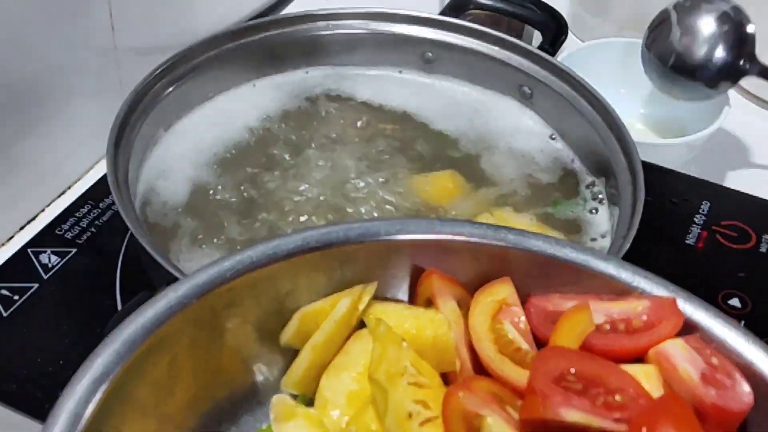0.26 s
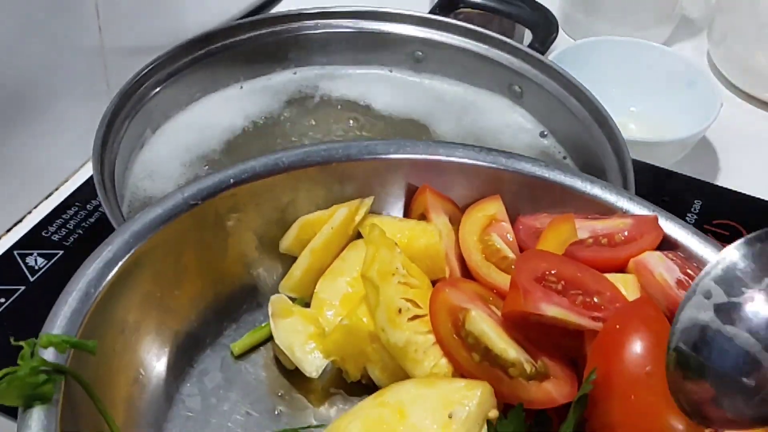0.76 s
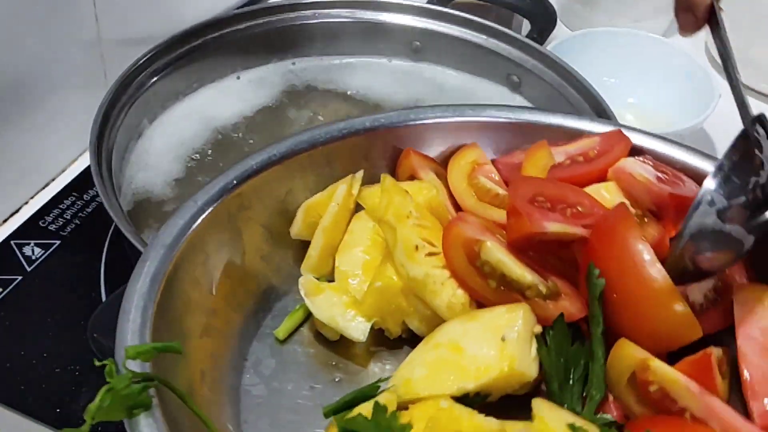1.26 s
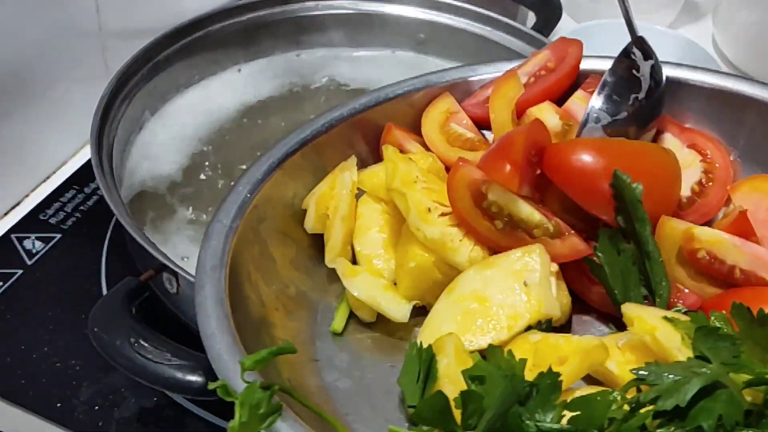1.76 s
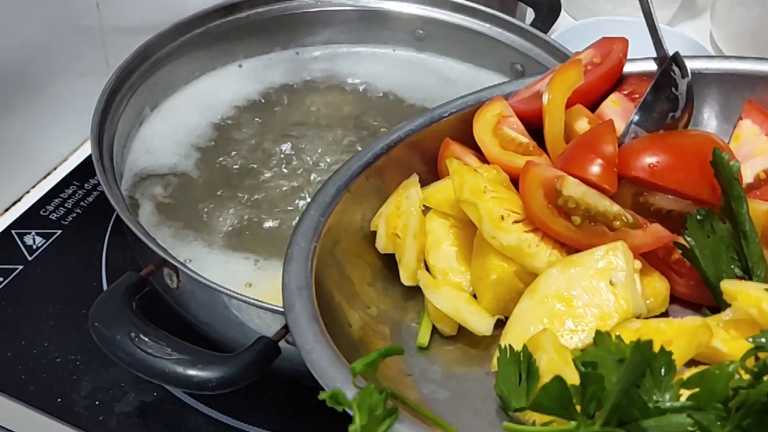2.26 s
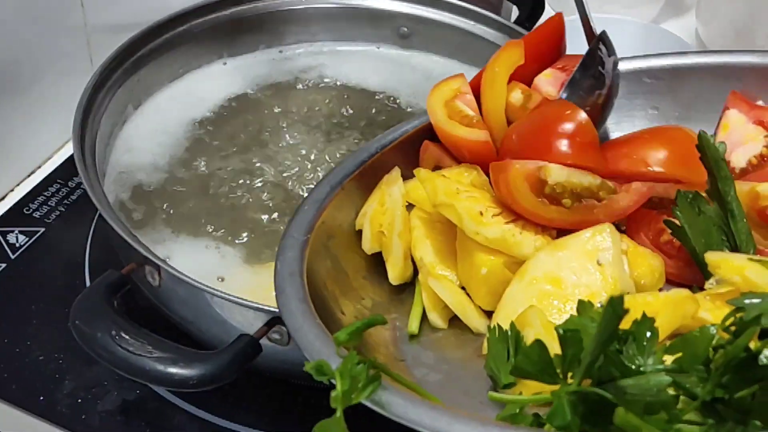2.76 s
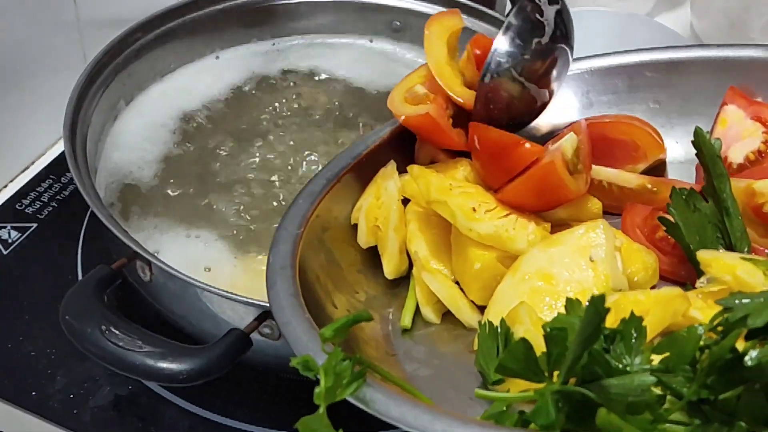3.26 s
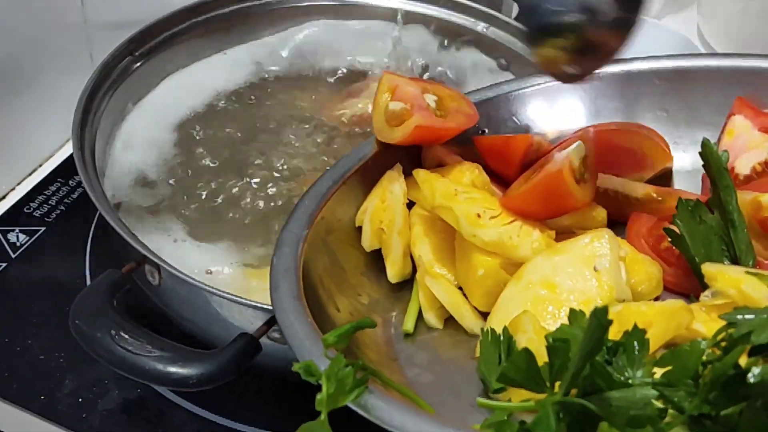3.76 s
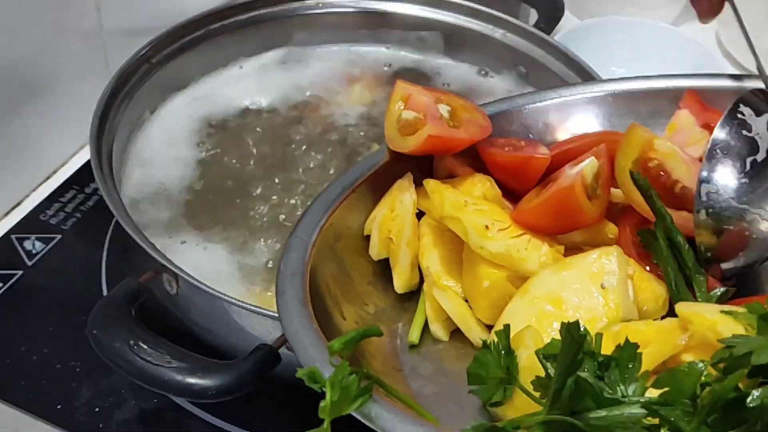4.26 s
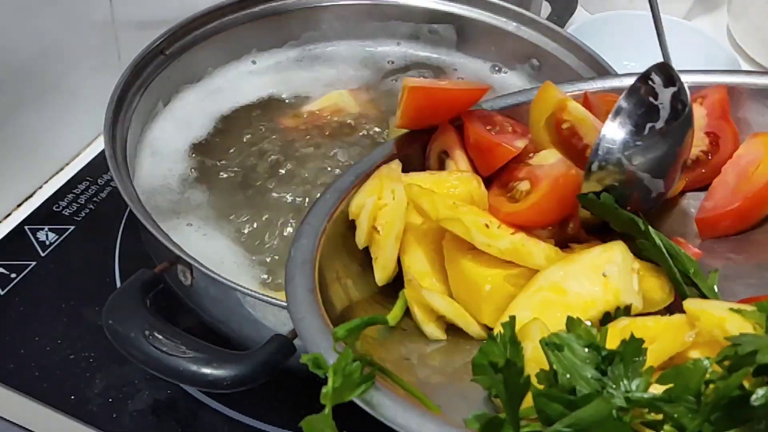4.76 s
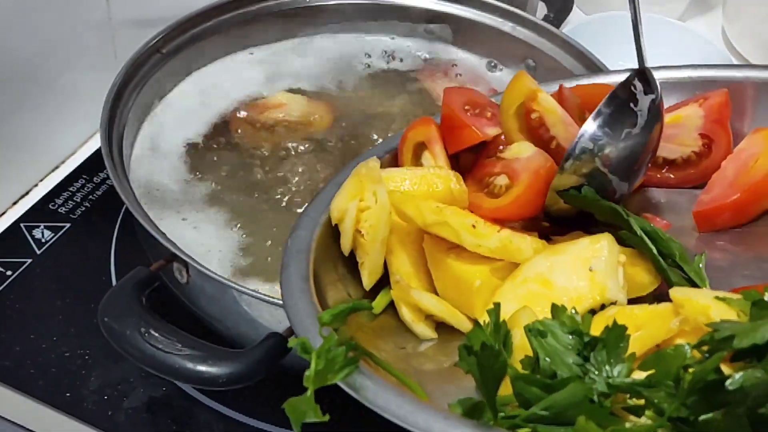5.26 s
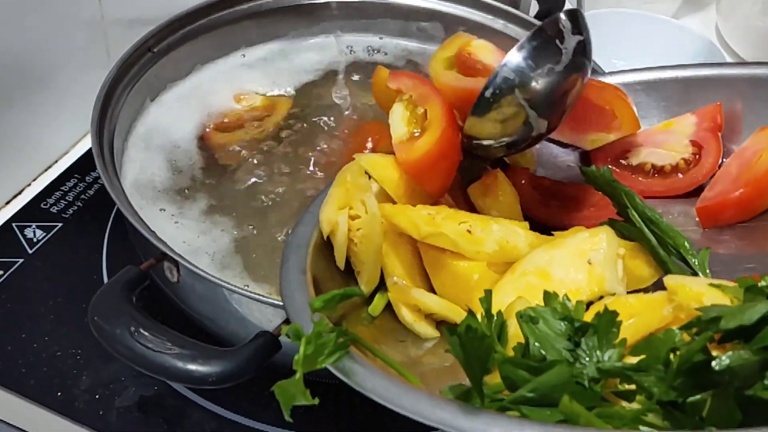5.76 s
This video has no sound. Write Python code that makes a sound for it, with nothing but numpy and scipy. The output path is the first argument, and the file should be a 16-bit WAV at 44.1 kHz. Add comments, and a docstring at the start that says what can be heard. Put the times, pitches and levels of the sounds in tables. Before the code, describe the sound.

Over a humming kitchen fan and fizzing pot, a ladle rings on china, then taps and scrapes intermittently in a food-filled metal bowl.

```python
"""A fan's hum is heard first; over it a steel ladle slides off a small china bowl, which clinks and rocks.
The ladle then knocks, scrapes and squeaks in a loaded steel bowl, beside a fizzing pot in a tiled kitchen.
Blows excite decaying modes, slips drive resonances, and locked slips sing as gliding notes.
Fan and rumble are shaped noise, narrow resonances and sines; the fizz is a dense train of coloured clicks."""
import sys
import numpy as np
from scipy import signal
from scipy.fft import rfft, irfft
from scipy.io import wavfile
from scipy.ndimage import uniform_filter1d

SR = 44100
rng = np.random.default_rng(int(sys.argv[2]) if len(sys.argv) > 2 else 0)


def transcribe(signal):
    """Save signal, clipped to [-1, 1], as a 16-bit WAV file at the path in sys.argv[1]."""
    frames = np.atleast_2d(signal).T
    limited = np.clip(frames, -1, 1)
    pcm = np.round(limited * 32767).astype(np.int16)
    wavfile.write(sys.argv[1], SR, pcm)


N = 264600
T = np.arange(N) / SR
RING_T = T[:SR * 3 // 4]   # time axis of one blow or echo [s]
LOW_SPLIT_HZ, HIGH_SPLIT_HZ = 1143, 4090
CUTOFF_HZ = 7820

# ladle clinking on the china bowl: (time [s], level [dB], thud [dB], brightness [dB], crack [dB],
# damping [Hz], none if negative); thud and brightness are relative to the middle band
CHINA_CLINKS = [(0.1528, -29, -1.5, 8.5, -11.5, 49), (0.1588, -32.5, -3.5, 13, 2.5, 23),
                (0.1632, -30, -2.5, -1, -1, -7), (0.166, -32, -1.5, 5, 2.5, -4)]
# china bowl rocking on the counter, before the split into two contacts: the columns of the clinks,
# then (place [0 one side of the foot to 1 the other])
BOWL_KNOCKS = [(0.2868, -27, 3, -29, -1, 29, 0.17), (0.313, -26.5, -0.5, -24, 2, 27, 0.3),
               (0.3448, -32.5, 9, -2, -6.5, 36, 1)]
# ladle sliding off the china: (start [s], end [s], treble rasp [dB], middle against treble [dB])
CHINA_STROKES = [(0.088, 0.118, -30, -14)]
# modes of the ladle and china ringing freely: (frequency [Hz], level [dB], t60 [s])
LADLE_MODES = [(310, -18.5, .2), (600, -7, .063), (770, -8, .08), (792, -11, .37), (1020, -11.5, .13),
               (1275, -8, .4), (1333, -1, .11), (1650, -12, .15), (2100, -9, .22), (2380, -12, .08),
               (2702, -7, .29), (3480, -12, .1), (4204, -18, .3), (4588, -4, .5), (4613, -1, .62),
               (4721, -5, .4), (4920, 0, .28), (5125, 1, .15), (5329, 3, .25), (5507, -4, .35),
               (6896, 3, .26), (6962, -3, .5), (7030, -3, .55), (7208, -4, .36), (5450, 10, .03),
               (5890, 16.5, .035), (6450, 3, .04)]
# modes of the china bowl on the counter, before contact damping:
# (frequency [Hz], level on one side of the foot [dB], level on the other [dB], t60 [s])
CHINA_MODES = [(280, -9, -9, .08), (450, -11, -6, .04), (630, -3, 5, .026), (800, 2, -3, .03),
               (950, 0, -4, .026), (1215, -15, -15, .1), (1276, -14, -13, .3), (1345, -9, -10, .09),
               (1380, -15, -15, .31), (1412, -7, -9, .06), (1465, -14, -13, .11), (1525, -10, -9, .1),
               (1728, -19, -16, .18), (1943, -20, -17, .2), (2013, -12, -15, .11), (2083, -16, -17, .25),
               (2299, -18, -18, .2), (2605, -9, -16, .07), (2708, -20, -20, .28), (2970, -14, -17, .06),
               (4610, -21, -21, .08), (6200, -22, -2, .05)]
# phase of the left port against the right, ladle in the air: (frequency [Hz], phase [rad])
LADLE_PORT_PHASE = [(300, 0), (900, -.5), (1800, -2), (3000, -2), (4600, 2.2), (5700, 2.3), (6890, 2.6),
                    (7010, 0)]
# the same for the china bowl: (frequency [Hz], phase [rad])
CHINA_PORT_PHASE = [(300, -0.5), (900, 1), (1300, -2.5), (3000, -2), (4500, -7), (6200, 25.5)]
RING_STOP_S, RING_STOP_DB_PER_S = 0.37, 297   # the hand stills the ladle


def ladle_on_china():
    """Friction and impact: the ladle slides, clinks and rings until the hand damps it; the bowl rocks."""
    # reciprocity of decay and bandwidth: a mode's ring time sets its width
    resonances = [(hz, np.log(1000) / (np.pi * t60), db) for hz, db, t60 in LADLE_MODES]
    slide = scrapes(CHINA_STROKES, resonances, slips_per_s=7900, spread_db=5, smear_hz=600)
    ring = blows(CHINA_CLINKS, LADLE_MODES, LADLE_PORT_PHASE, crack_t60=0.15, lowest_hz=310, pan_db=2.0)
    grip = from_db(-RING_STOP_DB_PER_S * np.maximum(T - RING_STOP_S, 0))
    contacts = bounces(BOWL_KNOCKS, gap_s=.0038, first_thud_db=-9, second_thud_db=1.5,
                       second_db=0.5, second_treble_db=-10.5, free_share=.07)
    rocking = blows(contacts, CHINA_MODES, CHINA_PORT_PHASE, crack_t60=0.079, lowest_hz=197, pan_db=0.0)
    return slide + grip * ring + rocking


# ladle striking the steel bowl, before the split into two contacts: (time [s], level [dB], thud [dB],
# brightness [dB], crack [dB], damping [Hz], place [0 bottom to 1 wall])
STEEL_TAPS = [(0.9358, -45, 9, -2, -8, 70, 0.48), (1.0352, -51, 11.5, 13.5, -7, 50, 0.49),
              (1.0598, -46.5, 7, 0, 3, 60, 0.76), (1.0655, -40, -6, 1.5, 7, 40, 0.41),
              (1.0908, -43.5, -16, 2, 7, 40, 0.79), (1.103, -49.5, -17, 1, 14, 40, .2),
              (1.264, -45.5, -1, 4.5, 3.5, 39.8, 0.36), (1.686, -28.5, 1, 2.5, -12, 35.8, 0.044),
              (1.905, -50.5, 10, 3.5, -6.5, 40, 0.27), (2.0103, -50, 14, 10, -7, 25, 0.49),
              (2.967, -49.5, 10, 7.5, 7, 40.4, 0.52), (3.059, -49, 6.5, 3, 3, 40, 0.6),
              (3.6546, -48, 7, 12, 14, 35, 0.67), (3.768, -46, -1, -1, 2, 39.7, 1),
              (4.174, -36.5, 6, 11.5, -3, 42, 0.86), (4.1842, -38, 3.5, 4, -10.5, 26.1, 0.81),
              (4.2283, -44.5, -4, 11, 3, 30, 0.9), (4.2365, -49.5, -4, 15, -1, 40, 0.92),
              (4.2652, -41, -10, 4, -3, 25, 0.58), (4.2735, -40.5, 1, 4, -5, 29.7, 0.79),
              (5.7564, -41, -2, 7.5, 9, 85, 0.93)]
# ladle sliding on the steel bowl: (start [s], end [s], treble rasp [dB], middle against treble [dB])
STEEL_STROKES = [(1.063, 1.111, -35, -6.5), (1.118, 1.44, -45.5, -6), (1.9025, 2.024, -43, -2),
                 (2.182, 2.236, -39, -8), (2.885, 3.002, -45.5, -1), (3.025, 3.09, -49, -6),
                 (3.659, 3.8, -50, -5), (4.19, 4.224, -34, -12), (4.2265, 4.286, -33.5, -19.5),
                 (4.799, 4.888, -43.5, -8), (5.58, 5.67, -47, -2)]
# resonances of the steel bowl damped by its load, before contact damping:
# (frequency [Hz], width [Hz], level struck on the bottom [dB], level struck on the wall [dB])
STEEL_RESONANCES = [(397, 56, 4.5, 16.5), (668, 31, 1.5, 7), (825, 18, -1.5, 3), (912, 26, -3, 4.5),
                    (1341, 20, -20.5, -9), (1718, 26, -1, -9), (1867, 22, -2, -7), (2010, 32, -10, -3),
                    (2170, 40, -16, -4), (2890, 38, -5.5, -15), (3480, 45, -22, -7), (3940, 48, -5, -29.5),
                    (4310, 88, -14, -18), (4600, 49, -12.5, -8), (4920, 32, -12, -16.5),
                    (5017, 30, -5, -13), (5270, 30, -11, -6), (5400, 34, -18, -3), (5530, 28, -9, -9),
                    (5735, 32, -15, -4), (6020, 22, -4.5, 0.5), (6230, 14, -8.5, -4), (6420, 22, -11, -2),
                    (6710, 20, -7, -18), (7100, 22, -8.5, -4.5), (7440, 25, -10.5, -3.5)]
# phase of the left port against the right, steel bowl: (frequency [Hz], phase [rad])
STEEL_PORT_PHASE = [(300, 0.58), (2000, 0.4), (7000, -1.4)]
SCRAPE_PLACE = 0.34   # all strokes rub at one place, about a third of the way from bottom to wall


def ladle_on_steel():
    """Modal impact and friction: the ladle knocks on the loaded steel bowl, slides and squeaks."""
    # a resonance's width sets how long it rings
    modes = [(hz, *levels, np.log(1000) / (np.pi * width)) for hz, width, *levels in STEEL_RESONANCES]
    rubbed = [(hz, width, struck_at(levels, SCRAPE_PLACE)) for hz, width, *levels in STEEL_RESONANCES]
    contacts = bounces(STEEL_TAPS, gap_s=0.0043, first_thud_db=-0.5, second_thud_db=3.0,
                       second_db=-3.0, second_treble_db=-6.0, free_share=0.2)
    taps = blows(contacts, modes, STEEL_PORT_PHASE, crack_t60=0.14, lowest_hz=256, pan_db=0.3)
    slides = scrapes(STEEL_STROKES, rubbed, slips_per_s=3500, spread_db=2.5, smear_hz=60)
    return slides + squeaks() + taps


def bounces(events, gap_s, first_thud_db, second_thud_db, second_db, second_treble_db, free_share):
    """Rebound: a bright, pressed contact, then a duller, freer one that comes later after a harder blow."""
    hardest_db = max(event[1] for event in events)
    contacts = []   # same columns as the blows
    for s, db, thud_db, brightness_db, crack_db, damping_hz, place in events:
        flight_s = gap_s * from_db((db - hardest_db) / 2)
        contacts.append((s, db, thud_db + first_thud_db, brightness_db, crack_db, damping_hz, place))
        contacts.append((s + flight_s, db + second_db, thud_db + second_thud_db,
                         brightness_db + second_treble_db, crack_db, damping_hz * free_share, place))
    return contacts


def struck_at(levels, place=0):
    """Modal participation: the place of contact sets how strongly each mode answers, in dB."""
    return levels[0] + np.clip(place, 0, 1) * (levels[-1] - levels[0])


# dense, quickly dying part of any blow: (frequency [Hz], relative density [dB per Hz])
CRACK_SPECTRUM = [(150, -2.5), (350, 1.5), (900, -13), (2200, -1.5), (3500, -11), (5500, 5), (7000, -4.5),
                  (8500, -4.5)]
CONTACT_S = .0005


def blows(events, modes, port_phase, crack_t60, lowest_hz, pan_db):
    """Modal synthesis: each blow cracks and rings the modes; a contact that stays pressed damps them."""
    out = np.zeros((2, N))
    hz, *mode_levels, t60 = np.transpose(modes)
    rings = np.exp(2j * np.pi * hz[:, None] * RING_T) * from_db(-60 * RING_T / t60[:, None])
    attack = slice(0, SR // 40)   # levels hold over these 25 ms
    contact = np.minimum(RING_T / CONTACT_S, 1)   # the force takes a moment to build
    for s, db, thud_db, brightness_db, crack_db, damping_hz, *place in events:
        # short waves reach the two ports out of step
        apart = at_hz(port_phase, hz) + np.minimum(hz / 3000, 1) * rng.normal(0, 0.25, len(hz))
        phase = rng.uniform(0, 2 * np.pi, len(hz)) + apart * [[.5], [-.5]]
        strength = from_db(struck_at(mode_levels, *place) + rng.normal(0, 1, (2, len(hz))))
        damping = np.exp(-np.pi * max(damping_hz, 0) * RING_T)
        ring = damping * ((strength * np.exp(1j * phase)) @ rings).imag
        crack = damping * noise(CRACK_SPECTRUM, size=len(RING_T)) * from_db(-60 * RING_T / crack_t60)
        blow = ring / rms(ring[:, attack]) + from_db(crack_db) * crack / rms(crack[:, attack])
        bands = three_bands(contact * blow)
        # the hardness and place of the contact set the weight of each band
        levels = from_db([db + thud_db, db, db + brightness_db])
        add(out, s, sum(level * band / rms(band[:, attack]) for level, band in zip(levels, bands)))
    # small bodies radiate little bass
    out = signal.sosfilt(signal.butter(2, lowest_hz, "high", fs=SR, output="sos"), out)
    return out * from_db([[pan_db / 2], [-pan_db / 2]])


RASP_TOP_HZ = 7000   # the rounded edge softens each slip


def scrapes(strokes, modes, slips_per_s, spread_db, smear_hz):
    """Friction excitation: tiny random slips of the ladle's edge drive the broadened resonances."""
    out, size = np.zeros((2, N)), SR // 2
    bins, t = freqs(size), T[:size]
    body = 0
    for k, (hz, width, db) in enumerate(modes):
        # neighbours take opposite signs
        body = body + from_db(db) * resonance(bins, hz, width + smear_hz) * (-1) ** k
    body = body / np.sqrt(1 + (bins / RASP_TOP_HZ) ** 10)
    for start, end, rasp_db, middle_db in strokes:
        slips = grains(slips_per_s, spread_db, size=size)
        _, middle, treble = three_bands(at_ports(slips, body))
        rasp = treble / rms(treble) + from_db(middle_db) * middle / rms(middle)
        add(out, start, from_db(rasp_db) * pressure(t, end - start) * rasp)
    return out


# sliding edge catching and singing: (start [s], end [s], level before the stroke's swell [dB],
# start pitch [Hz], end pitch [Hz], step between partials [dB], roughness [0-1, held at 1 above])
SQUEAK_NOTES = [(1.061, 1.104, -35, 6200, 6150, 0, 0.45), (1.062, 1.076, -38, 4380, 4350, 0, 0.8),
                (1.085, 1.098, -42, 1990, 1990, -15, .6), (1.088, 1.119, -41, 2850, 2890, -6, 0.34),
                (1.094, 1.126, -42, 4920, 4880, 0, 0.4), (1.965, 1.988, -46, 5990, 6220, 0, 0.1),
                (2.012, 2.077, -44.5, 6060, 5970, 0, 0.36), (2.887, 2.922, -46, 2020, 1954, -5, 0.9),
                (2.927, 2.962, -44.5, 2020, 1900, 0, 0.83), (2.962, 2.992, -43, 2000, 1995, -2, 1.1),
                (3.02, 3.05, -39, 1936, 2056, -4.5, 0.8), (3.065, 3.105, -44, 1960, 1990, -12, 0.8),
                (4.237, 4.264, -34, 5800, 5900, 0, 0.8), (4.233, 4.278, -35.5, 6700, 6700, 0, .9),
                (4.278, 4.289, -37, 4330, 4250, 0, 0.1), (4.288, 4.308, -42, 6100, 6060, 0, .3),
                (4.81, 4.883, -47, 5980, 5970, 2, 0.08), (5.631, 5.659, -41.5, 5990, 6010, 0, 0)]
STUTTERS_PER_S, STUTTER_BEND = 260, 0.017   # a squeak catches and lets go; its pitch bends by this share


def squeaks():
    """Stick-slip: where slips lock, the edge sings a gliding note; a rough one flutters."""
    out, t = np.zeros((2, N)), T[:SR // 8]
    for start, end, db, start_hz, end_hz, step_db, roughness in SQUEAK_NOTES:
        rough = np.clip(roughness, 0, 1)
        rows = rng.standard_normal(size=(7, 100))
        bend, *flutter = [np.interp(t * STUTTERS_PER_S, np.arange(len(row)), row) for row in rows]
        glide_hz = np.interp(t, [0, max(end - start, .005)], [start_hz, end_hz])
        hz = glide_hz * (1 + rough ** 2 * STUTTER_BEND * bend)
        phase, note = 2 * np.pi * np.cumsum(hz) / SR, 0
        for k in range(min(int(CUTOFF_HZ / start_hz), len(flutter) // 2)):
            # steady part plus random flutter
            grip = np.sqrt(1 - rough ** 2) + rough * (flutter[2 * k] + 1j * flutter[2 * k + 1])
            apart = at_hz(STEEL_PORT_PHASE, (k + 1) * start_hz) * np.array([[.5], [-.5]])
            partial = (grip * np.exp(1j * ((k + 1) * phase + apart))).imag
            note = note + from_db(k * step_db) * partial
        add(out, start, from_db(db) * pressure(t, end - start) * note / rms(note))
    return out


def pressure(t, length_s):
    """Normal force: the hand bears down and lets up over a stroke."""
    progress = np.clip(t / max(length_s, .005), 0, 1)
    return np.sqrt(np.abs(np.sin(np.pi * progress)))


KITCHEN_T60_S = .75


def kitchen(x, early_db, early_t60, late_db):
    """Reverberation by convolution: quick reflections from hob and tiles, then the room's tail."""
    # (frequency [Hz], relative density [dB per Hz])
    colour = [(100, -6.0), (400, 1.5), (1500, -1.0), (3500, 4), (5700, -4.5), (8000, -0.5), (12000, -54.5)]
    arrival = np.clip((RING_T - .003) / 0.016, 0, 1)
    echo = 0
    for level_db, t60 in [(early_db, early_t60), (late_db, KITCHEN_T60_S)]:
        part = noise(colour, size=len(RING_T)) * arrival * from_db(-60 * RING_T / t60)
        echo = echo + from_db(level_db) * part / np.sqrt(np.sum(part ** 2) / 2)
    return signal.fftconvolve(x, echo, axes=1)[:, :N]


# fizz of the simmering water: (frequency [Hz], relative level [dB])
FIZZ_SPECTRUM = [(700, 0.5), (1800, -1.5), (3000, -19.5), (4200, 0), (5500, 5), (6100, 4.5), (6800, 0),
                 (7500, -1), (8500, -39.5)]
FIZZ_DB = -45.5


def simmer(bursts_per_s, spread_db):
    """Shot noise: countless small bubbles burst at the surface."""
    bursts = grains(bursts_per_s, spread_db, size=N)
    return from_db(FIZZ_DB) * at_ports(bursts, from_db(at_hz(FIZZ_SPECTRUM, freqs(N))))


# resonances of the fan and its duct: (frequency [Hz], width [Hz], rms level [dB])
DUCT_RESONANCES = [(71.4, 12, -66), (130, 10, -74.5), (179.8, 6.2, -56.5), (196.9, 7, -56.5),
                   (270.8, 7.8, -52), (374.5, 10, -48), (406.5, 9.3, -38), (462, 9, -46), (778, 8.3, -54.5),
                   (2200, 120, -72.5), (2810, 68, -67)]


def hum(level_db, steadiness):
    """Resonance under turbulent drive: narrow tones waver in level and pitch with the air flow."""
    power, bins = 0, freqs(N)
    for hz, width, db in DUCT_RESONANCES:
        # the squared peak is narrower, so its width is raised
        power = power + from_db(db) ** 2 / width * np.abs(resonance(bins, hz, 1.65 * width)) ** 4
    tones = at_ports(rng.standard_normal((2, N)), np.sqrt(power))
    swell = np.sqrt(uniform_filter1d(np.mean(tones ** 2, axis=0), size=SR // 6) + 1e-9)
    total = np.sqrt(sum(from_db(db) ** 2 for _, _, db in DUCT_RESONANCES))
    return from_db(level_db) * total * tones / swell ** steadiness   # partly evens out the swell


# whine of the fan's motor: (multiple of the blade rate [1], rms level before waver, trim and balance [dB])
WHINE_PARTIALS = [(6, -58), (7, -63.5), (8, -59), (9, -58.5)]
BLADE_HZ = 233.33


def whine(level_db, waver_db):
    """Harmonic series: thin partials of the blade rate hold their pitch and waver in level."""
    out, knots = 0, np.linspace(0, T[-1], num=24)
    for multiple, db in WHINE_PARTIALS:
        waver = from_db(waver_db * np.interp(T, knots, rng.standard_normal(size=24)))
        cycles = round(multiple) * BLADE_HZ * T + rng.random()
        out = out + from_db(db) * waver * np.sqrt(2) * np.sin(2 * np.pi * cycles)
    return out * from_db(level_db + np.array([[3], [-4]]))   # stronger on the left


# rush of the hob's fan: (frequency [Hz], relative density [dB per Hz])
FAN_SPECTRUM = [(20, -36), (70, -14.5), (150, -12), (230, -6), (280, 5), (420, -2.5), (520, -3),
                (760, -1.5), (1000, -10.5), (1250, -15.5), (2100, -14), (2700, -17), (3800, -23),
                (8000, -42)]
FAN_DB = -35.5


def fan_rush():
    """Turbulence: the fan's air flow is steady broadband noise."""
    return from_db(FAN_DB) * noise(FAN_SPECTRUM, size=N)


# low rumble under the fan: (frequency [Hz], relative density [dB per Hz])
RUMBLE_SPECTRUM = [(15, -16), (35, 1), (70, -1.5), (130, -2), (250, -28.5), (600, -78)]
# course of the rumble: (time [s], level before the trim [dB])
RUMBLE_COURSE = [(0.0, -45), (1.15, -50.5), (1.37, -45.5), (1.94, -54), (5.03, -64.5), (6.0, -46.5)]
RUMBLE_TRIM_DB = -2


def low_rumble():
    """Amplitude modulation: low noise slowly falls and rises in level."""
    level_db = RUMBLE_TRIM_DB + np.interp(T, *np.transpose(RUMBLE_COURSE))
    return from_db(level_db) * noise(RUMBLE_SPECTRUM, size=N)


# likeness of the sound at the two microphone ports: (frequency [Hz], correlation [-1 to 1])
PORT_LIKENESS = [(30, .6), (100, .94), (250, .97), (420, .98), (750, .83), (1100, .6), (1500, -.1),
                 (2400, .1), (3400, -.4), (4500, .1), (5600, -.3), (8000, -.1)]
# balance of the ports: (frequency [Hz], left minus right [dB])
PORT_BALANCE = [(30, -8.5), (100, 3.5), (400, 2.5), (900, 4), (1200, 2), (2000, 5.5), (3200, -0.5),
                (5300, 2.5), (6900, -2), (8000, -0.5)]


def at_ports(white, gain):
    """Diffuse-field coherence: colour two unrelated signals and blend them for the two ports; rms 1."""
    size = white.shape[1]
    hz = freqs(size)
    mid, side = rfft(white)
    alike = np.clip(at_hz(PORT_LIKENESS, hz), -1, 1)
    sides = np.array([[1], [-1]])
    both = np.sqrt(1 + alike) * mid + sides * np.sqrt(1 - alike) * side
    both = both * from_db(sides * at_hz(PORT_BALANCE, hz) / 2)
    out = irfft(both * gain, size)
    return out / rms(out)


def noise(spectrum, size):
    """Spectral shaping: stereo noise with a given spectrum; rms 1."""
    return at_ports(rng.standard_normal((2, size)), from_db(at_hz(spectrum, freqs(size))))


def grains(per_s, spread_db, size):
    """Random point process: clicks of uneven strength."""
    born = rng.random((2, size)) < per_s / SR
    uneven_db = spread_db * np.minimum(rng.exponential(1, (2, size)), 4)
    return born * rng.standard_normal((2, size)) * from_db(uneven_db)


def resonance(bins, hz, width):
    """Damped oscillator: gain of a resonance over frequency, 1 on top."""
    return 1 / (1 + 2j * (bins - hz) / width)


def three_bands(x):
    """Band splitting: low, middle and treble."""
    cuts = [(LOW_SPLIT_HZ, "low"), ([LOW_SPLIT_HZ, HIGH_SPLIT_HZ], "band"), (HIGH_SPLIT_HZ, "high")]
    return [signal.sosfilt(signal.butter(4, hz, kind, fs=SR, output="sos"), x) for hz, kind in cuts]


def from_db(db):
    """Logarithmic level: decibels to amplitude gain."""
    return 10 ** (np.asarray(db) / 20)


def rms(x):
    """Effective value: root mean square."""
    return np.sqrt(np.mean(x ** 2) + 1e-20)


def at_hz(points, hz):
    """Logarithmic pitch: read a table by frequency on a log axis."""
    f, value = np.transpose(points)
    return np.interp(np.log(hz + 1e-3), np.log(f), value)


def freqs(size):
    """Discrete spectrum: frequencies of the bins of a real transform."""
    return np.arange(size // 2 + 1) * SR / size


def add(out, s, sound):
    """Superposition: mix a stereo sound in from time s."""
    start = max(round(s * SR), 0)
    out[:, start:start + sound.shape[1]] += sound[:, :N - start]


def scene():
    """Superposition of direct and reverberant ladle work with fan, pot and rumble."""
    ladle = ladle_on_china() + ladle_on_steel()
    room = kitchen(ladle, early_db=-15.0, early_t60=0.041, late_db=-13.0)
    pot = simmer(bursts_per_s=9000, spread_db=1.5)
    fan = fan_rush() + hum(level_db=0.0, steadiness=0.3) + whine(level_db=-2.5, waver_db=3.0)
    return ladle + room + pot + fan + low_rumble()


PEAK_LIMIT = .8


def record(dry):
    """Soft saturation and band limiting: high peaks are rounded, and little passes above the cut-off."""
    rounded = dry / (1 + (dry / PEAK_LIMIT) ** 4) ** .25
    return signal.sosfilt(signal.ellip(10, .3, 70, CUTOFF_HZ, fs=SR, output="sos"), rounded)


dry = scene()
out = record(dry)
transcribe(out)
```